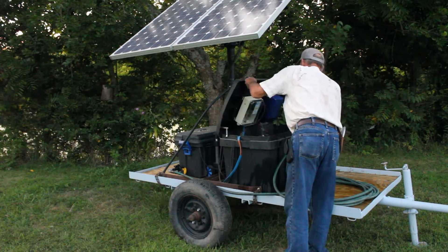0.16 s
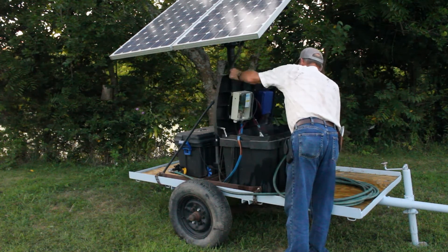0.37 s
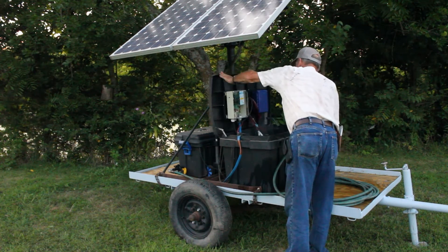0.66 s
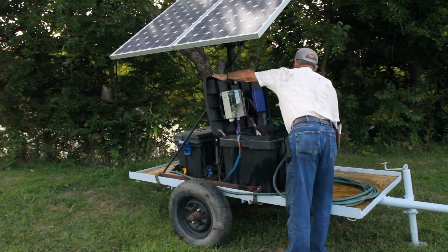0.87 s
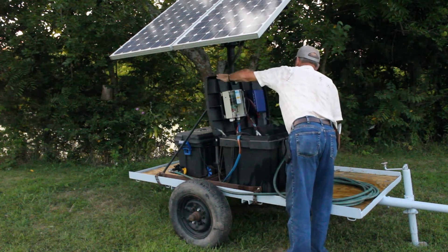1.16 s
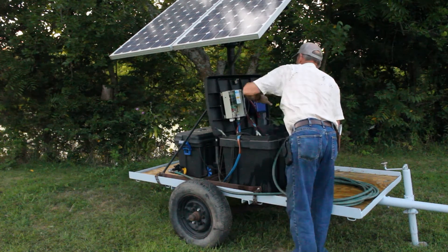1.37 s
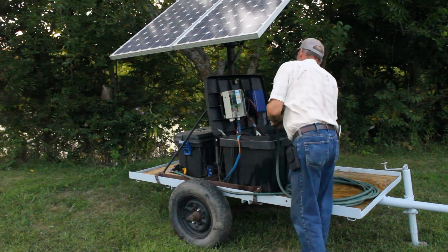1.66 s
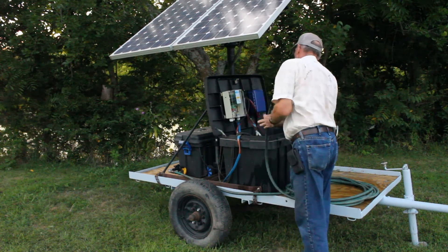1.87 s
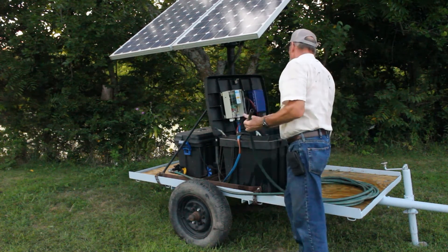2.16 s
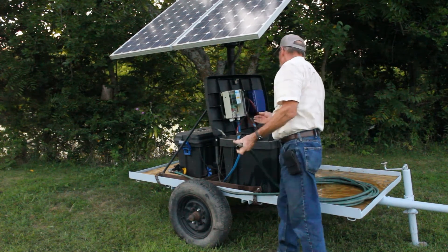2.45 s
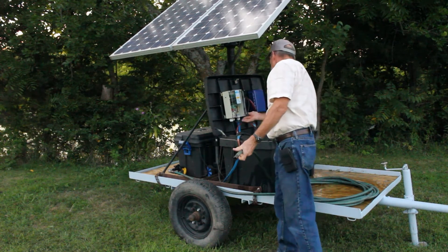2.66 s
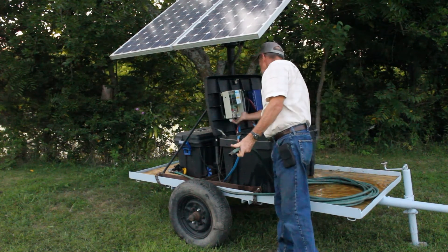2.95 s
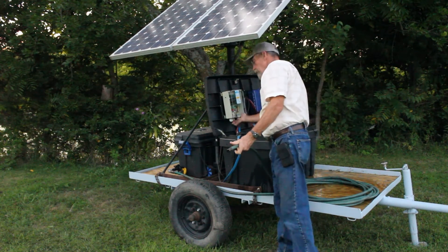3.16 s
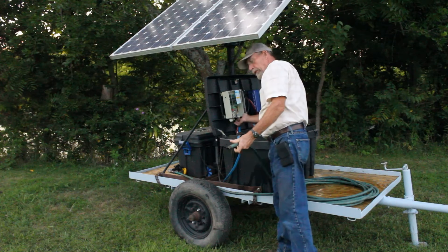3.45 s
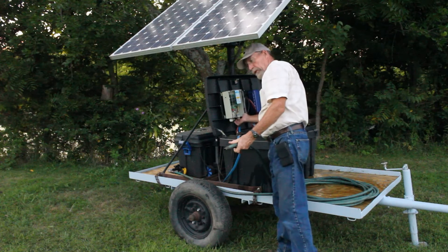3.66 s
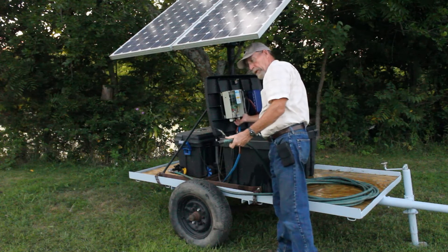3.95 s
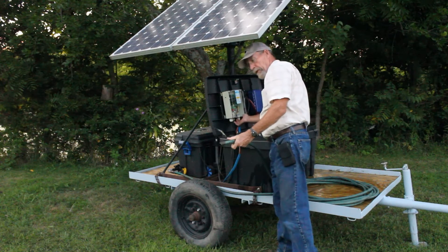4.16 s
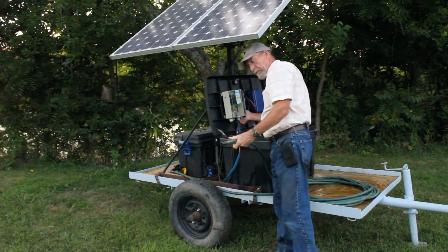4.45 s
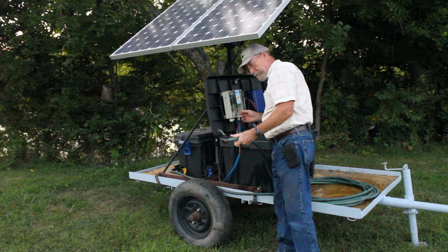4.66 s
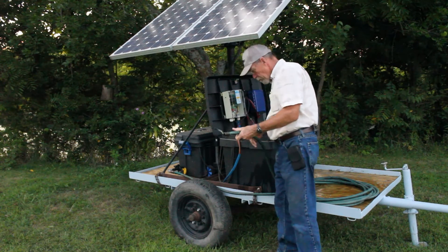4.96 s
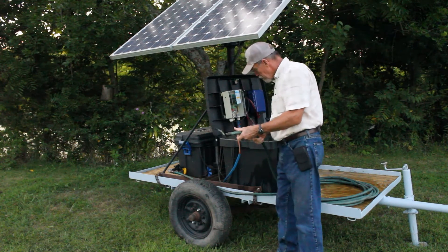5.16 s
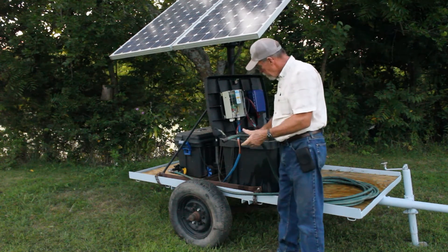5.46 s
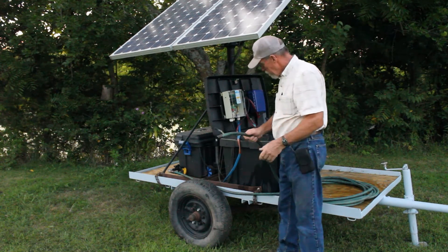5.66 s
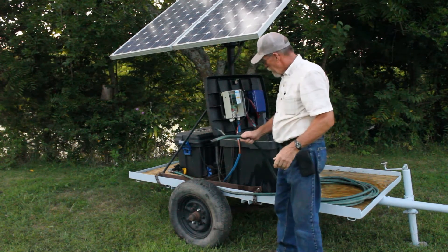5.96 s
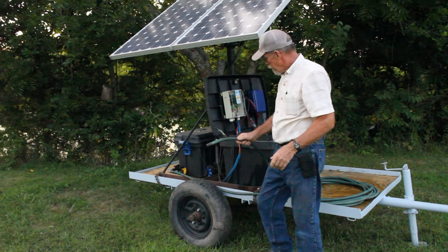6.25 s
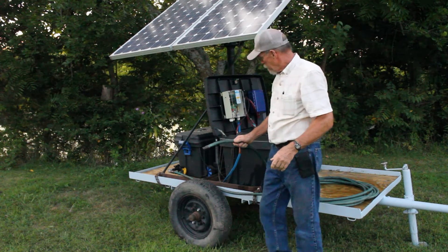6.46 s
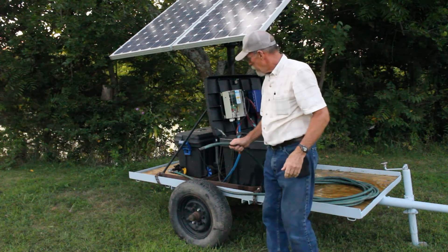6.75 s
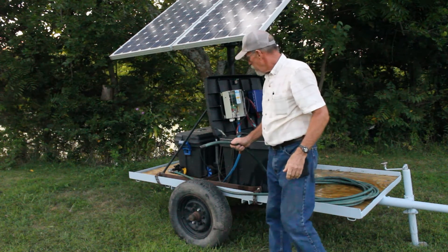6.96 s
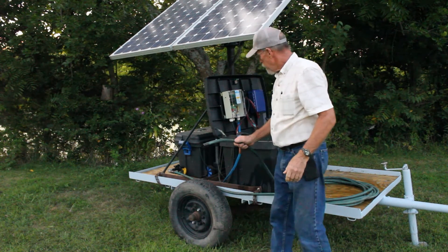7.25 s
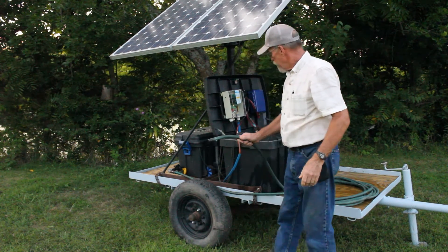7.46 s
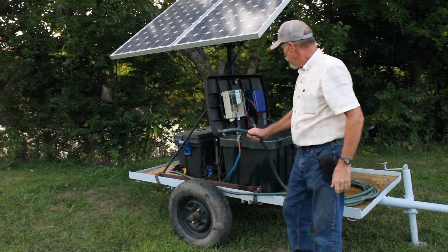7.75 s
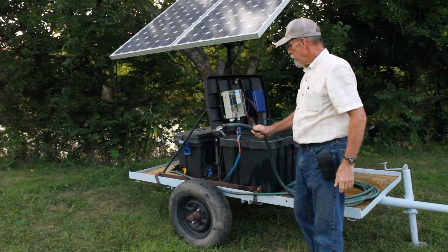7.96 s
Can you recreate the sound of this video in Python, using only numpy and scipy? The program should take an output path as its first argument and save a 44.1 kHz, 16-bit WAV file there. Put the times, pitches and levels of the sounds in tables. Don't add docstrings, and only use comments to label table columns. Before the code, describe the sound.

A constant shimmering insect chorus at dusk fills the high range over a very low rush of distant air. A hollow plastic lid rattles, thuds and cracks loudly around one and a half seconds, with short tree reflections. Handling then turns sparse: small clicks, a dry tick at four seconds as one rasping katydid stops, later cloth brushing and light plastic knocks. Mono outdoor pickup, the box near.

```python
import sys
import numpy as np
from scipy import signal
from scipy.fft import rfft, irfft, next_fast_len
from scipy.io import wavfile
from scipy.ndimage import uniform_filter1d

SR = 44100
rng = np.random.default_rng(int(sys.argv[2]) if len(sys.argv) > 2 else 0)


def ratio_of_db(decibels):
    return 10 ** (np.asarray(decibels, float) / 20)


def log_audio(samples):
    frames = np.atleast_2d(samples).T
    limited = np.clip(frames, -1, 1)
    pcm = np.round(limited * 32767).astype(np.int16)
    wavfile.write(sys.argv[1], SR, pcm)


N = 357651
T = np.arange(N) / SR
KNOCK_T = np.arange(int(.3 * SR)) / SR

# pitch_hz, level_db, fade_s (time to fall 60 dB)
TONGUE = [(1345, 0, .014), (1140, -21, .06), (1226, -22, .1), (1345, -19, .07), (1500, -28, .035),
          (835, -29, .07), (955, -31, .08), (1680, -21, .03), (1820, -26, .045), (2095, -26, .04),
          (2600, -28, .02), (3260, -27, .015), (4000, -28, .012)]
BODY_SHUT = [(184, -1.5, 0.14), (260, 3.5, 0.073), (330, -1.5, 0.14), (455, 0.5, 0.066), (593, -10.5, .09),
             (700, -19, .06)]
BODY_SEAT = [(150, -1.5, .12), (194, -2.5, 0.22), (260, 1, .11), (380, -3.5, 0.074), (475, -6.5, 0.09),
             (566, -8, 0.14), (698, -8.5, .06), (1020, -7.5, .05)]
BODY_DROP = [(62.4, -14, 0.35), (174, -2.5, 0.18), (277, 3, 0.094), (321, 0, 0.08), (372, -1, .08),
             (466, -4.5, 0.099), (570, 6, 0.061), (700, -5, 0.055), (844, -5, 0.034), (1210, -2.5, 0.031),
             (1665, -5.5, 0.037), (2140, -8.5, 0.038)]
CLAMP = [(285, -2.5, 0.14), (463, 0.5, 0.11), (677, 3, 0.096), (825, 0, 0.078), (996, -0.5, 0.1),
         (1240, 3.5, 0.072), (1334, 2.5, 0.051), (1630, -8, .04), (1820, 4, 0.042), (2140, 1, 0.04),
         (2640, -10, 0.038), (3050, 6.5, .035), (3440, -16, .03)]


def evened(x):
    return x / np.sqrt(np.mean(x ** 2) + 1e-20)


def columns(rows):
    s, *values = np.transpose(rows)
    return [np.interp(T, s, v) for v in values]


def noise(colour):
    f, db = np.transpose(colour)
    size = next_fast_len(N)
    hz = np.fft.rfftfreq(size, 1 / SR)
    gain = ratio_of_db(np.interp(np.log(hz + 1), np.log(f + 1), db))
    spectrum = rfft(rng.standard_normal(size)) * gain
    return evened(irfft(spectrum, size)[:N])


def drift(seconds):
    size = max(int(seconds * 1000), 1)
    steps = rng.standard_normal(N // 44 + 2)
    steps = uniform_filter1d(uniform_filter1d(steps, size), size)
    return np.interp(np.arange(N) / 44, np.arange(len(steps)), evened(steps))


def bumps(rows):
    t = np.arange(0, N / SR + .002, .002)
    swells = sum(ratio_of_db(db) * np.exp(-((t - s) / half) ** 2) for s, half, db in rows)
    return np.interp(T, t, swells)


def strokes(turns, from_hz, to_hz, length, uneven_db=1.0):
    t = np.arange(int(length * SR)) / SR
    tone = np.sin(2 * np.pi * (from_hz * t + (to_hz - from_hz) * t ** 2 / (2 * length)))
    tone *= (t / length) ** 0.34 * (1 - t / length) ** 2.16
    starts = np.zeros(N)
    at = np.flatnonzero(np.diff(np.floor(turns)) > 0)
    starts[at] = ratio_of_db(uneven_db * rng.standard_normal(1500)[:len(at)])
    return evened(signal.oaconvolve(starts, tone)[len(t) // 3:][:N])


def foliage(x, wet_db, t60):
    t = np.arange(int(.3 * SR)) / SR
    echoes = rng.standard_normal((2, len(t))) * (rng.random((2, len(t))) < .05) * ratio_of_db(-60 * t / t60)
    stir = np.pi * 1.3 * T
    shared = x * np.array([np.sin(stir), np.cos(stir)])
    wet = signal.oaconvolve(shared, echoes, axes=1).sum(0)[:N]
    return evened(x + ratio_of_db(wet_db) * evened(wet) * np.std(x))


def ground_crickets():
    # start_s, lag_turns of the steady groups, lag_turns of the drifting group,
    # then in_step_db of the low, middle and high group
    togetherness = [(0, .27, .2, -6, 0, 5), (1, .27, .26, -7, -1, 3), (1.6, .28, .4, -6, -7, -7),
                    (2.5, .42, .64, -6, -4, 4), (3, .33, .72, -5, -5, 3), (3.5, .3, .84, -2, -2, 0),
                    (4, .28, 1.04, -1, -1, 3), (5, .38, 1.33, 1, 1, 2), (6.2, .45, 1.61, 2.5, 3, 3),
                    (7, .4, 1.48, 2.5, 3, 0), (7.5, .38, 1.34, 2.5, 3, -1), (8.11, .37, 1.3, 1, 3, 1)]
    start_hz = [7740, 7990, 8225]
    fall_hz = (246, 272, 151)
    strays_db, in_step_db = (-50, -47, -49), (-55.5, -49.5, -53.5)
    beat = 7.4 * T
    steady, drifting, *steps = columns(togetherness)
    lags = (steady + .08, steady, drifting)
    near = far = 0
    for hz, fall, lag, db, stray_db, step_db in zip(start_hz, fall_hz, lags, steps, strays_db, in_step_db):
        on_beat = sum(
            strokes(beat - lag + late + 0.025 * drift(.06), hz + spread, hz + spread - fall, 0.055)
            for late, spread in [(.09, -22.5), (0.01, -60), (-0.07, 18)])
        near = near + ratio_of_db(step_db + db) * evened(on_beat)
        strays = sum(
            strokes(beat + k / 6 + .08 * drift(.4), hz - spread, hz - spread - 267, .05)
            for k, spread in enumerate(rng.permutation(np.linspace(0, 170, 6))))
        far = far + ratio_of_db(stray_db - 0.22 * db) * evened(strays)
    near = np.std(near) * foliage(near, -12, .12)
    return near + np.std(far) * foliage(far, 2.5, 0.28)


def field_crickets():
    # middle_s, effort_db
    high_chirps = [(.01, 2), (.38, 0), (.56, -7), (.78, -5), (1.0, -21), (1.22, -2), (1.61, -1), (1.99, 0),
                   (2.35, -6), (2.62, -4), (2.79, 0.5), (3.0, -11), (3.23, 1), (3.56, 2), (3.75, -2),
                   (3.98, -7), (4.11, -6), (4.34, 2), (4.73, -1), (4.94, -3), (5.1, -2), (5.3, -11.5),
                   (5.5, -7), (5.83, 0), (6.25, 1), (6.63, -3), (7.02, -4), (7.42, -2), (7.74, -7),
                   (8.05, -16)]
    # middle_s, effort_db
    low_chirps = [(.35, 1), (.57, -4), (.9, -1), (1.21, -12), (1.56, -7), (1.87, -1), (2.12, -3.5),
                  (2.35, -14), (2.72, 1), (3.29, 5.5), (3.72, 1), (4.03, -4), (4.4, 1.5), (4.92, 2),
                  (5.12, -10), (5.72, 2), (6.34, 3), (6.93, 2), (7.44, -5.5), (7.96, 3)]
    # strokes_per_s, from_hz, to_hz, level_db
    leaders = [(22.8, 5070, 4750, -52.5), (18.35, 4730, 4590, -52.5)]
    # chirps, chirp dB, murmur between chirps dB, half length s, from Hz, to Hz
    groups = [(high_chirps, -48.5, -5.5, 0.034, 5170, 4550), (low_chirps, -51, -3.5, 0.076, 4880, 4200)]
    singers = [(19.61, 6.5, 0.96), (24.45, 0.5, 1.0), (26.8, 0.5, 0.96), (20.74, -12.5, 0.9),
               (28.53, 0.5, 0.97), (22.34, -4.5, 0.93), (31.5, -9.0, 0.98), (17.88, 1, .94), (27.2, 2.0, 0.95)]
    out = 0
    for group, leader in zip(groups, leaders):
        chirps, call_db, between_db, half, from_hz, to_hz = group
        lead_rate, lead_hz, end_hz, lead_db = leader
        murmur = ratio_of_db(between_db)
        effort = murmur + (1 - murmur) * bumps([(s, half, db) for s, db in chirps])
        song = 0
        for rate, near_db, tune in singers:
            turns = rate * T + .4 * drift(.3)
            song = song + ratio_of_db(near_db) * strokes(turns, from_hz * tune, to_hz * tune, 0.0317)
        out = out + ratio_of_db(call_db) * effort * foliage(song, -5, .25)
        lead = strokes(lead_rate * T + .2 * drift(.3), lead_hz, end_hz, .036)
        out = out + ratio_of_db(lead_db) * effort ** 1.63 * foliage(lead, -8, 0.14)
    return signal.sosfilt(signal.ellip(6, 1, 40, 5110, fs=SR, output="sos"), out)


def katydids():
    # pitch_hz, level_db per Hz
    meadow_wing = [(10500, -37), (12000, -4), (14000, -4.5), (15000, 4.5), (15700, -3.5)]
    # pitch_hz, level_db per Hz
    cone_wing = [(8000, -12.5), (10500, 2.5), (12000, 3.5), (14500, 15.5), (16000, 4)]
    turn = (30.92 * T - .18 - .14) % 1
    meadow = evened(0.26 + turn ** 1.3) * noise(meadow_wing) * (T < 3.985)
    out = ratio_of_db(-43.5) * meadow
    for strokes_per_s, db in [(177.7, -50), (183.85, -49.5)]:
        turns = strokes_per_s * T - 0.32 * drift(0.56)
        gate = evened(np.exp(1.3 * np.cos(2 * np.pi * turns)))
        out = out + ratio_of_db(db + 1.5 * drift(0.45)) * gate * noise(cone_wing)
    return out


def far_singers():
    # pitch_hz, level_db per Hz
    haze = [(2500, -43.5), (3800, -23.5), (4200, -5.5), (5400, -8.5), (6600, -20), (7200, 2.5), (7600, 1.5),
            (8500, 4.5), (9500, 4.5), (10300, -14.5), (11500, -3), (13500, 1), (16000, -4)]
    # strokes_per_s, from_hz, to_hz, length_s, level_db
    trills = [(57.35, 3450, 3130, .009, -70), (51.7, 3250, 2950, .009, -68.5), (89, 6210, 5460, .004, -63),
              (43.7, 8550, 8450, 0.026, -60), (43.03, 9380, 8500, 0.0174, -54),
              (41.6, 9560, 9470, .02, -59)]
    # start_s, effort_db
    warming_up = [(0, -59), (.4, -64), (1.2, -60), (1.85, -55.5), (2.2, -57.5), (4.3, -57.5), (5.2, -51),
                  (6.3, -48), (8.11, -45.5)]
    # middle_s, half_length_s, level_db
    buzzes = [(2.0, 0.9, -50.5), (3.85, 0.37, -55), (5.2, 0.7, -64), (6.3, 0.56, -48.5), (7.6, 0.81, -48.5)]
    # start_s, level_db, from_hz, to_hz, length_s
    lone_calls = [(.272, -49, 6300, 6940, .016), (1.174, -48, 6100, 7200, .028),
                  (2.83, -57, 6600, 7100, .014), (2.978, -54, 6400, 7200, .016),
                  (3.108, -53, 6200, 7230, 0.016), (3.668, -47, 6280, 6850, 0.012),
                  (1.13, -60, 3400, 4200, .035), (4.486, -53, 3900, 4600, .03),
                  (5.364, -58, 3020, 4500, 0.061), (5.505, -55, 6300, 7100, 0.014)]
    out = ratio_of_db(-42 + 0.68 * drift(0.031)) * noise(haze)
    for rate, from_hz, to_hz, length, db in trills:
        turns = rate * T + .3 * drift(.3) + .1 * drift(.02)
        out += ratio_of_db(db) * foliage(strokes(turns, from_hz, to_hz, length), 9, 0.15)
    triller = strokes(43 * T + 0.26 * drift(.2), 9960, 9660, 0.019)
    out += ratio_of_db(columns(warming_up)[0] - 4.5) * foliage(triller, 5.1, 0.12)
    buzz = noise([(9800, -21.0), (10200, -5.0), (11200, -8.0), (12000, -9.0)])
    out += ratio_of_db(-4.5) * (ratio_of_db(-57.5) + bumps(buzzes)) * buzz
    rasp = ratio_of_db(2.5 * drift(.003))
    for s, db, from_hz, to_hz, length in lone_calls:
        t = np.arange(int(length * SR)) / SR
        start = round(s * SR)
        call = np.hanning(len(t)) * signal.chirp(t, from_hz, t[-1], to_hz)
        out[start:][:len(t)] += ratio_of_db(db) * rasp[start:][:len(t)] * call
    return out


def far_air():
    # pitch_hz, level_db per Hz
    air = [(18, -45), (30, 0), (81, 8), (166, -19), (415, 5), (460, 6.5), (650, -3.5), (1440, -22),
           (1560, -20), (3900, -14), (5070, -26), (8580, -120)]
    return ratio_of_db(-69) * noise(air)


def handling():
    # start_s, length_s, level_db
    brushes = [(0.118, 0.056, -58), (2.515, 0.1, -65), (4.407, 0.041, -74), (6.193, 0.095, -55.5),
               (6.29, 0.21, -59), (6.657, 0.093, -58.5), (6.881, 0.134, -56.5), (7.504, 0.15, -58.5),
               (7.922, 0.19, -62.5)]
    # middle_s, half_length_s, level_db
    shuffles = [(.2, 0.038, -56), (.42, 0.4, -59), (.9, 0.2, -55.5), (.96, .04, -52), (1.62, 0.15, -57.5),
                (2.5, 0.17, -71.5), (3.5, 0.25, -64.5), (3.9, 0.087, -72.5), (3.08, 0.045, -64),
                (4.09, 0.092, -61), (6.9, .12, -85), (7.75, 0.32, -67.5)]
    # pitch_hz, level_db per Hz
    rustle_colour = [(250, -10.5), (600, -1), (1500, -4), (2800, -7.5), (7000, -7), (10000, -20)]
    # pitch_hz, level_db per Hz
    shuffle_colour = [(50, -23), (120, -1.5), (165, 2), (230, -3.5), (420, -7.5), (800, -22)]
    brush = 0
    for s, length, db in brushes:
        shape = np.interp(T, [s, s + 0.02, s + length, s + length], [0.021, 0.63, 0.67, 0.04])
        brush = brush + ratio_of_db(db) * shape
    rustle = (ratio_of_db(-62.5) + brush) * ratio_of_db(drift(0.0052)) * noise(rustle_colour)
    shuffle = (ratio_of_db(-63.5) + bumps(shuffles)) * ratio_of_db(0.5 * drift(0.059)) * noise(shuffle_colour)
    return rustle + shuffle


def ring(modes, hz, t, tune):
    return sum(ratio_of_db(db - 60 * t / t60) * np.sin(2 * np.pi * hz * ratio * k * t)
               for (ratio, db, t60), k in zip(modes, tune))


def tick(t, low_hz, high_hz):
    band = signal.butter(2, [low_hz, high_hz], "bandpass", fs=SR, output="sos")
    crack = signal.sosfilt(band, rng.standard_normal(len(t)))
    return crack * (ratio_of_db(-60 * t / 0.033) + ratio_of_db(-11.5 - 60 * t / 0.14))


def add_at(out, s, sound):
    out[round(s * SR):][:len(sound)] += sound


def plug_tocks():
    # start_s, level_db, pitch_hz
    tocks = [(0.194, -38, 169), (.675, -45, 175), (1.45, -45.5, 800), (2.1084, -43, 643), (7.462, -55, 735),
             (7.5194, -46.5, 726), (7.8136, -46, 733), (7.82, -44.5, 488), (7.821, -48, 310),
             (7.858, -49, 1120), (8.019, -53, 1140), (8.058, -48, 1140), (8.02, -54, 485)]
    # pitch_ratio, level_db, fade_s
    plug = [(1, 7, 0.056), (0.62, -6, .06), (2.0, -3.5, 0.04)]
    out = np.zeros(N + SR)
    for s, db, hz in tocks:
        tock = ring(plug, hz, KNOCK_T, np.ones(len(plug))) * (1 - np.exp(-KNOCK_T / 0.0053))
        add_at(out, s, ratio_of_db(db) * tock)
    return out


def lid_thuds():
    # start_s, level_db, pitch_hz
    thuds = [(0.223, -59, 283), (0.4, -51, 350), (0.419, -51.5, 410), (0.4433, -51.5, 399),
             (0.5723, -51, 426), (0.7124, -58.5, 518), (0.7582, -60, 455), (0.8463, -57.5, 403),
             (0.918, -46, 270), (0.9297, -43, 302), (0.9678, -52, 302), (1.132, -59.5, 625),
             (1.705, -50, 260), (3.4648, -55, 448), (3.6536, -58, 337), (4.343, -62, 463),
             (6.491, -64, 211), (6.931, -59, 295), (7.5922, -59, 330), (7.631, -64, 410), (7.671, -67, 396),
             (7.98, -66, 403)]
    # pitch_ratio, level_db, fade_s
    lid = [(1, 8, 0.053), (.4, -6, 0.079), (.62, -5.5, 0.11), (1.4, 1, 0.059), (1.75, -4.5, 0.079),
           (2.1, 0.5, 0.044), (2.9, -2.5, 0.037)]
    out = np.zeros(N + SR)
    for s, db, hz in thuds:
        tune = rng.uniform(0.91, 1.03, len(lid))
        thud = ring(lid, hz, KNOCK_T, tune) * (1 - np.exp(-KNOCK_T / 0.0028))
        add_at(out, s, ratio_of_db(db + 7.0) * thud)
    return out


def latch_snaps():
    # start_s, ring_db, ring_hz, tick_db
    snaps = [(0.224, -48, 1240, -62), (0.3987, -44, 1410, -56), (.42, -49, 1720, -56),
             (0.444, -44, 1370, -52), (0.575, -34, 1535, -43.5), (.7125, -46, 910, -61),
             (0.759, -44, 1070, -68), (.8884, -43, 1120, -41), (0.908, -54, 1450, -48),
             (0.932, -46, 2080, -46), (0.9656, -38, 1380, -50), (0.99, -45, 1350, -63),
             (1.1318, -50, 1470, -62), (1.3985, -48, 1324, -40.5), (1.6772, -40, 1336, -29.5),
             (1.683, -19.5, 900, -42), (3.4655, -39, 1010, -56), (3.6534, -50, 1210, -56),
             (4.0395, -55, 1250, -38.5), (4.342, -53, 940, -62), (5.144, -45.5, 1184, -65),
             (7.566, -53, 1790, -49), (7.572, -47, 1770, -45), (7.593, -44, 800, -49),
             (7.632, -49, 1400, -59), (7.8135, -37, 1400, -62), (7.855, -47, 1500, -53),
             (8.0207, -40.5, 1240, -66), (8.0567, -42, 1190, -69)]
    # pitch_ratio, level_db, fade_s
    latch = [(1.018, 10, 0.0081), (0.64, -26, 0.03), (.8, -21, 0.056), (.92, -28, 0.085),
             (1.27, -13, 0.042), (1.55, -22, 0.039), (2.2, -24.5, 0.032)]
    out = np.zeros(N + SR)
    for s, db, hz, tick_db in snaps:
        tune = rng.uniform(0.94, 1.03, len(latch))
        snap = ring(latch, hz, KNOCK_T, tune) * (1 - np.exp(-KNOCK_T / .0012))
        add_at(out, s, ratio_of_db(db + 1.5) * snap + ratio_of_db(tick_db + 8.0) * tick(KNOCK_T, 1140, 4230))
    return out


def hard_blows():
    # start_s, level_db, rise_s, part struck
    hits = [(0.889, -28.5, 0.00076, BODY_DROP), (1.3859, -26.5, 0.00051, TONGUE),
            (1.388, -31, 0.0028, BODY_SEAT), (1.3979, -12, 0.0012, TONGUE),
            (1.4015, -31, 0.0028, BODY_SEAT), (1.6735, -16.5, 0.0009, TONGUE), (1.6771, 1.5, .0012, TONGUE),
            (1.6815, -26, 0.0011, BODY_SHUT), (4.0392, -41, 0.00059, CLAMP)]
    out = np.zeros(N + SR)
    for s, db, rise, part in hits:
        blow = ring(part, 0.98, KNOCK_T, np.ones(len(part))) * (1 - np.exp(-(KNOCK_T / rise) ** 2))
        add_at(out, s, -ratio_of_db(db) * blow)
    return signal.sosfilt(signal.butter(4, 56, "highpass", fs=SR, output="sos"), out)


def clip_ticks():
    # start_s, level_db, centre_hz
    clips = [(.9335, -43, 2300), (.8955, -49, 2300), (2.1105, -44, 4600), (2.1135, -42, 4100),
             (2.1195, -44, 6200), (6.7, -44, 5700), (4.457, -51, 3200), (6.4894, -52, 3500),
             (7.521, -41, 4500), (7.9658, -45.5, 2800)]
    out = np.zeros(N + SR)
    for s, db, hz in clips:
        add_at(out, s, ratio_of_db(db + 6) * tick(KNOCK_T, hz * .55, hz * 1.7))
    return out


def box():
    small = plug_tocks() + lid_thuds() + latch_snaps() + clip_ticks()
    small = signal.sosfilt(signal.butter(3, 105, "highpass", fs=SR, output="sos"), small)
    t = KNOCK_T
    echoes = rng.standard_normal(len(t)) * (rng.random(len(t)) < .04) * (t > .004)
    echoes *= ratio_of_db(-25 - 60 * t / 0.036) + ratio_of_db(-36 - 60 * t / 0.36)
    echoes[0] = 1
    return signal.oaconvolve(small + hard_blows(), echoes)[:N]


def fly():
    # start_s, wingbeat_hz, level_db
    flight = [(3.78, 238.4, -79), (3.85, 236.4, -69), (4.1, 233.2, -71), (4.16, 233.6, -63.5),
              (4.24, 229.5, -61.5), (4.3, 226.7, -76), (4.36, 231.7, -64.5), (4.47, 226, -71.5),
              (4.7, 225.7, -72.5), (5.2, 226, -86)]
    tones_db = [-15, -4.5, -4.5, -2.5, -1, -4, -1, -11.5]
    hz, db = columns(flight)
    turns = np.cumsum(hz * (1 + 0.00603 * drift(.02))) / SR
    hum = sum(ratio_of_db(tone_db + 3.9 * drift(0.049)) * np.sin(2 * np.pi * k * turns)
              for k, tone_db in enumerate(tones_db, 1))
    return ratio_of_db(db) * hum * (T > flight[0][0]) * (T < flight[-1][0])


def engine_drone():
    # start_s, pitch_hz, level_db
    engine = [
        (5.4, 93.2, -73.5),
        (6, 93, -68),
        (6.7, 93, -62),
        (7.4, 93.2, -63.5),
        (8, 91.5, -67.5),
    ]
    hz, db = columns(engine)
    turns = np.cumsum(hz * (1 + 0.0079 * drift(0.25))) / SR
    return ratio_of_db(db - 2 + 1.2 * drift(0.076)) * np.sin(2 * np.pi * turns)


def scene():
    insects = ground_crickets() + field_crickets() + katydids() + far_singers()
    others = far_air() + handling() + box() + fly() + engine_drone()
    return np.tile(insects + others, (2, 1))


def band_limit(x):
    return signal.sosfilt(signal.butter(12, 16670, fs=SR, output="sos"), x)


def record(dry):
    pair = signal.sosfilt(signal.butter(2, 42, "highpass", fs=SR, output="sos"), dry)
    treble_limit = signal.firwin(1023, 15730, window=("kaiser", 9), fs=SR)
    pair = signal.oaconvolve(pair, treble_limit[None], "same")
    mix = pair * np.clip((T[-1] - T) / 0.002, 0, 1)
    return band_limit(mix)


dry = scene()
out = record(dry)
log_audio(out)
```